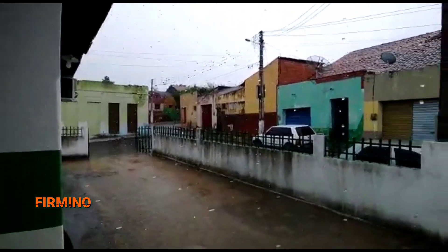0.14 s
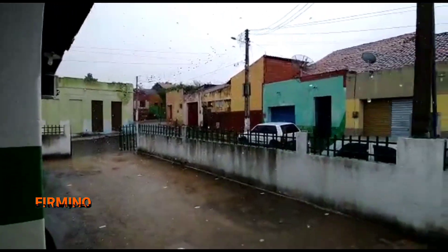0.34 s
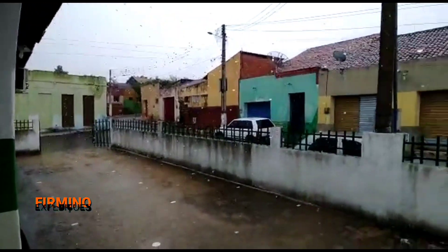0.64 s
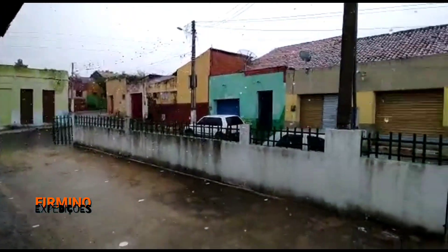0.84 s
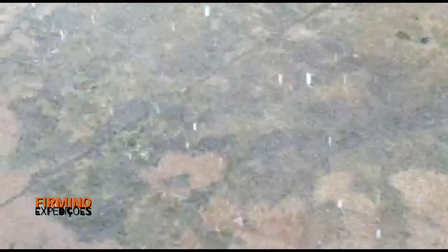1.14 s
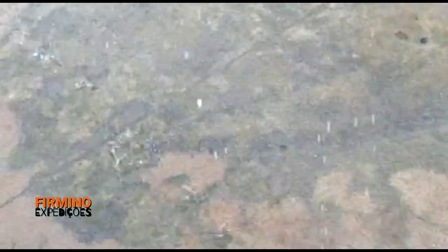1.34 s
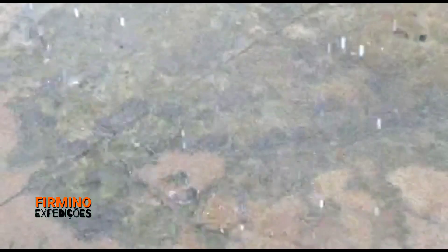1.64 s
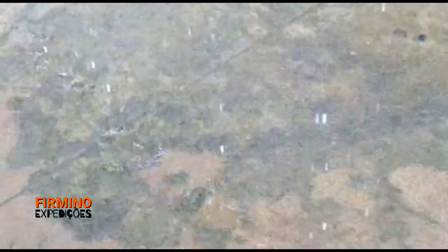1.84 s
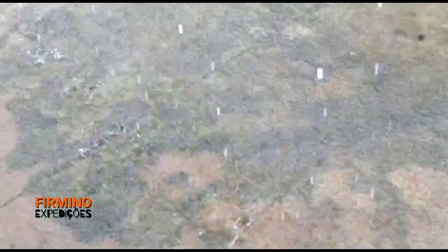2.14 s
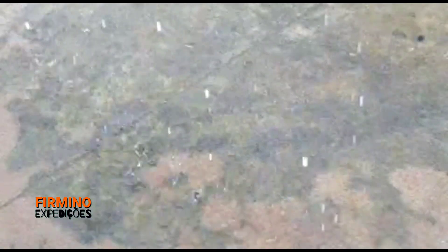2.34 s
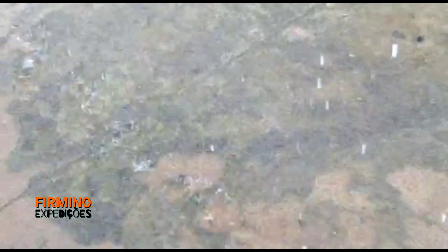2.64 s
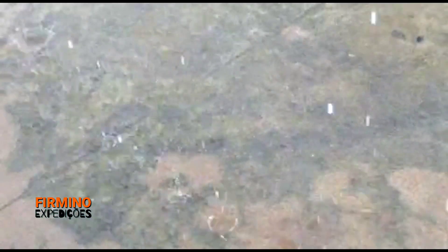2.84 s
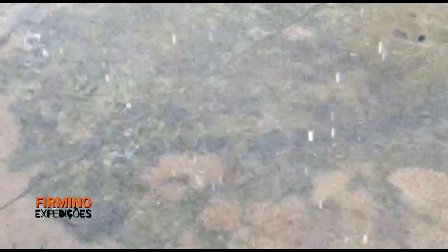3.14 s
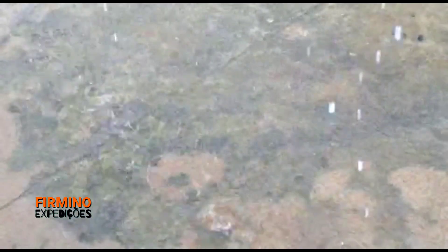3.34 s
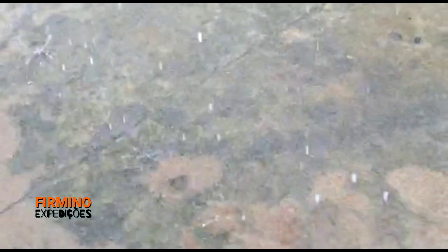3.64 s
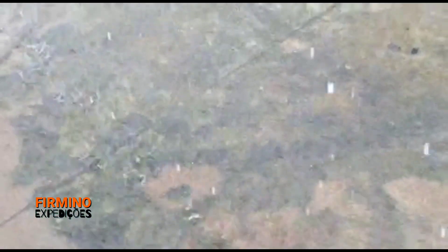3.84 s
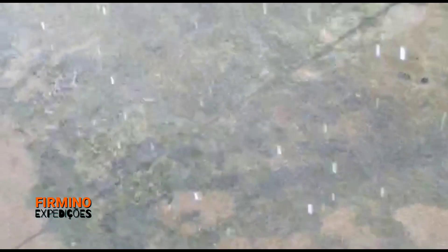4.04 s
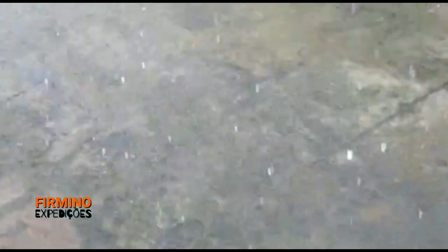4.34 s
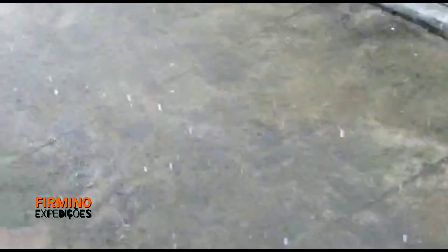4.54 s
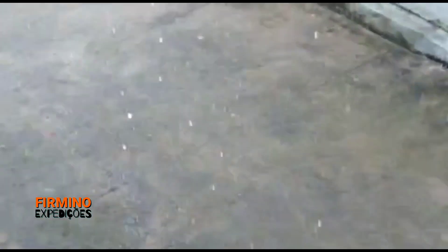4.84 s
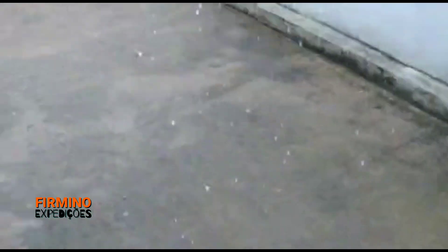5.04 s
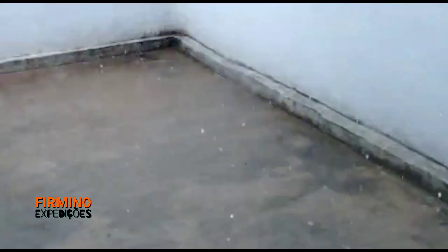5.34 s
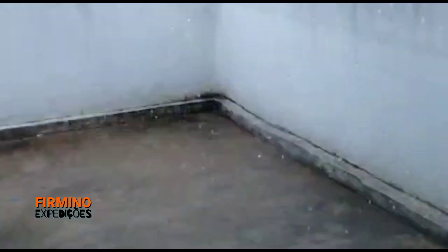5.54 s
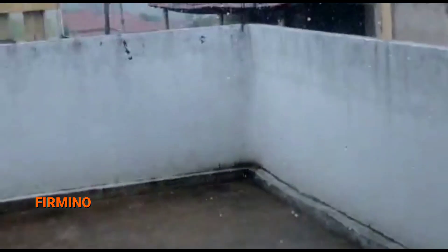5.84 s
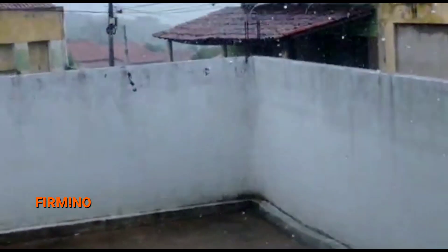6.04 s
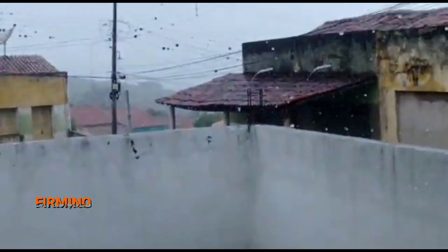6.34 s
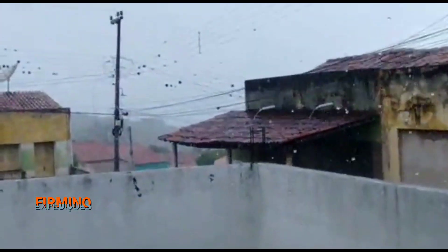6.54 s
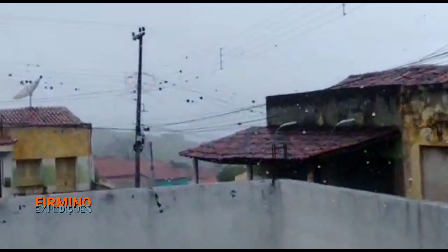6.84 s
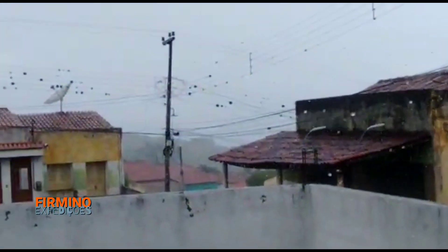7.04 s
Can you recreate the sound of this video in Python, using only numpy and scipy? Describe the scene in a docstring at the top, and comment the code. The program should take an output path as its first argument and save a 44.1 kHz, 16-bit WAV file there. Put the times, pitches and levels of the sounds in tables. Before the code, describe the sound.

A steady bright downpour heard from a porch, full of crisp ticking drops, puddle plips and irregular spattering run-off.

```python
"""Heavy rain on tiles and flooded paving, heard by a hand-held phone under a porch: noise, partly chopped
into thousands of drops, forms a far hiss, a low roar and a patter that gushes of run-off swell.
Short clicks are drops on hard paving, rising tones are bubbles in puddles, and fat drops ring surfaces.
Run-off from the eaves lands in cracks with a spatter of noise; drips ring something hollow nearby.
The colour shifts as the phone turns, and its two ports (left and right) hear differently."""
import sys
import numpy as np
from scipy import signal
from scipy.fft import rfft, irfft, next_fast_len
from scipy.io import wavfile
from scipy.ndimage import uniform_filter1d, map_coordinates

SR = 44100
rng = np.random.default_rng(int(sys.argv[2]) if len(sys.argv) > 2 else 0)


def file_out(sig):
    """Save sig as 16-bit WAV at sys.argv[1]."""
    # one column per channel
    cols = np.atleast_2d(sig).T
    # limit, then scale
    lim = np.clip(cols, -1, 1)
    pcm = np.round(lim * 32767).astype(np.int16)
    wavfile.write(sys.argv[1], SR, pcm)


N = 317065

# middle pitches of rumble, roar, drumming, low patter, dull patter, bright drops, spray: [Hz]
LAYER_HZ = [90, 400, 1100, 1900, 3500, 7500, 12500]
# run-off splashes: (time [s], level before the port and pitch gains [dB], centre [Hz],
# spatter against the splash level [dB], spatter length [s])
SPLASHES = [(.01, -20, 8000, -11, .03), (.0205, -21, 8300, -16, .02), (0.026, -24, 8300, -16, .02),
            (0.102, -18, 7760, -11, 0.027), (0.108, -19, 8500, -14, .03), (.129, -22.5, 7840, -10, .05),
            (.2, -26, 6500, -19, .03), (.2737, -19, 8190, -16, .05), (0.3284, -14, 8630, -20, .046),
            (0.413, -21, 8650, -18, .04), (.4245, -22, 8500, -18, .03), (.4715, -25, 8500, -21, .03),
            (.4803, -17, 8450, -19, .05), (0.516, -25, 8300, -20, .03), (0.522, -15, 8000, -15, .06),
            (0.58, -23, 7500, -18, .04), (.6078, -19, 8200, -9, .04), (0.62, -17, 7700, -12, .05),
            (0.634, -16, 8320, -13, .06), (.6611, -17, 8040, -15, .05), (0.796, -26, 3950, -18, .03),
            (0.866, -18, 7470, -17, .05), (0.918, -17, 3680, -13, .03), (.937, -16, 8220, -16, 0.027),
            (.942, -25, 4160, -8, .06), (0.967, -15.5, 8400, -11, 0.048), (0.974, -24, 8500, -16, .03),
            (1.08, -21, 8240, -16, .03), (1.09, -17, 8000, -16, .03), (1.097, -22, 10000, -15, .031),
            (1.2508, -22, 8500, -14, .03), (1.419, -23, 2400, -6, .05), (1.4335, -23, 5800, -14, .04),
            (1.5055, -28, 6000, -16, .03), (1.526, -21, 3200, -12, .02), (1.5665, -18, 8000, -14, .04),
            (1.712, -25, 3800, -7, .04), (2.1088, -25, 3700, -14, .03), (2.1324, -21, 3700, -11, .03),
            (2.317, -18.5, 5400, -5, 0.055), (2.3355, -23, 5600, -10, .03), (2.3515, -17, 6550, -13, .04),
            (2.355, -21, 6600, -12, .03), (2.7225, -17, 8100, -14, .04), (2.739, -25, 3420, -14, .02),
            (2.7475, -21, 3140, -5, .02), (2.753, -22, 3700, -11, .025), (2.7875, -29, 2980, -12, 0.033),
            (2.793, -23.5, 4200, -14, .03), (2.971, -21, 2870, -13, .02), (2.9777, -32, 3300, -12, .02),
            (2.9916, -23, 3800, -10, .02), (2.995, -22, 2820, -17, .02), (3.0978, -19, 8300, -18, .03),
            (3.15, -23, 5000, -11, .04), (3.384, -23, 3170, -14, .03), (3.488, -18, 8190, -13, .04),
            (3.561, -22, 4660, -5, 0.034), (3.776, -14, 8000, -16, .05), (3.826, -25, 3700, -14, .03),
            (3.994, -25, 2240, -17, .04), (4.312, -22, 5800, -16, .03), (4.3668, -26, 2340, -8, .04),
            (4.421, -25, 2800, -7, .03), (4.509, -18, 8260, -20, .03), (4.522, -19, 3280, -16, .02),
            (4.559, -22.5, 2380, -4, .035), (4.8713, -17, 8350, -10.5, .08), (4.872, -20, 4670, -12, .05),
            (4.8785, -16, 9100, -14, .04), (4.886, -19, 8500, -16, .03), (5.3094, -22, 7170, -9, .07),
            (5.3694, -26, 2200, -14, .07), (5.6094, -21.5, 7000, -6, 0.12), (5.6117, -27, 2300, -12, .03),
            (5.753, -26, 9270, -6, .07), (5.825, -20, 2310, -8, .04), (5.991, -32, 2080, -19, .02),
            (6.096, -25, 2200, -6, .05), (6.108, -25, 2000, -10, .03), (6.67, -16, 7280, -12, 0.064),
            (6.737, -25, 2300, -12, .04), (6.808, -20, 2160, -7, .05), (6.9815, -19, 6300, -12, .03),
            (7.033, -20, 3770, -14, .03), (7.098, -17, 6500, -10, .03), (7.143, -15, 7600, -7.5, 0.076)]
# drips on the hollow thing: (time [s], level before the port gains [dB], lowest ring [Hz], length [s])
DRIPS = [(3.842, -47, 480, .05), (3.889, -46, 300, .05), (5.064, -41.5, 900, .07), (5.172, -47, 570, .033),
         (5.262, -45, 600, .033), (5.436, -46, 600, .03), (5.462, -41, 600, .038), (5.663, -43, 660, .036),
         (5.705, -47, 600, .04), (5.959, -47, 600, .035)]
# colour each port gives the rain, as relative gains: (pitch [Hz], left [dB], right [dB])
PORT_GAINS = [(49, -30, -31), (92, -14.5, -18.5), (140, -16.5, -18), (198, -16, -18.5), (604, -14, -16),
              (920, -12, -15.5), (2050, -5, -13), (2720, -6.5, -10), (4170, -6, -10), (5730, -7, -11.5),
              (6700, -4, -11), (10000, -5.5, -9), (12140, -13.5, -12.5), (14800, -15.5, -16.5)]
# resonances of each port: (pitch [Hz], width [Hz], boost [dB])
LEFT_RESONANCES = [(87, 15, 2.5), (689, 43, 0.5), (6960, 170, 3.5), (8120, 960, 6), (9300, 210, 5)]
RIGHT_RESONANCES = [(88, 14, 3), (2840, 200, 2.5), (6950, 200, 2), (8300, 900, 1.5), (9400, 400, 1.5)]
# how alike left and right are: (pitch [Hz], likeness [0-1])
LIKENESS = [(60, 0.99), (290, 0.99), (640, 0.58), (1400, 0.04)]
# echoes off porch floor, wall and ceiling: (left delay [s], right delay [s], gain [dB])
ECHOES = [(.0074, 0.009, -15.5), (0.013, 0.02, -16), (0.021, 0.04, -20.5)]
# lean of the rain to one side: (time [s], left minus right against its mean [dB])
SIDE_LEAN = [(0, 2), (.7, 2), (1.3, 0), (2, -.6), (5, -.4), (6, .6), (7.19, .6)]
# surfaces that ring under the fat drops: (pitch [Hz], width [Hz], left minus right [dB])
SURFACES = [(624, 51, 5), (1620, 160, 14), (2207, 115, 10), (3800, 660, 17)]
# how much reaches the left port as the phone turns, before the gushes:
# (time [s], first surface [dB], second [dB], third [dB], fourth [dB])
SURFACE_LEVELS = [(0, -84, -81, -74, -57), (1.2, -70, -57, -52, -44), (1.5, -70, -70, -53, -42),
                  (3.5, -80, -72, -51, -40.5), (4.4, -71, -68, -50, -48), (4.9, -59, -69, -47.5, -45),
                  (6, -56.5, -51, -44.5, -45.5), (6.7, -63, -47, -43.5, -50), (7.19, -54, -57, -49, -38)]
# steady patter, of which only the changes about the mean are used: (time [s], bright drops [dB], dull patter [dB])
PATTER_LEVELS = [(0, -41, -47.5), (.44, -41, -48), (.84, -40, -44), (1.17, -42.5, -45.5),
                 (1.235, -41.5, -45.5), (1.255, -38, -42), (1.7, -37, -39), (1.88, -38, -40.5),
                 (2.05, -35, -38), (2.6, -36, -38.5), (3.3, -35.5, -38.5), (3.6, -34.5, -38.5),
                 (3.74, -35, -41.5), (3.9, -35.5, -39), (4.6, -35, -38), (5.2, -35.5, -40),
                 (5.7, -35.5, -41), (5.99, -34, -39.5), (6.43, -34.5, -39.5), (7.19, -33.5, -38)]
# gushes of run-off that swell the patter round a pitch:
# (time [s], swell at the centre [dB], centre [Hz], spread [octaves], length [s])
GUSHES = [(0, 3, 7500, 0.54, 0.069), (0.322, 6, 10400, .5, 0.037), (.46, 2.7, 8800, 0.42, 0.12),
          (0.6, 1.5, 7500, 0.79, 0.17), (0.617, 3, 3200, 0.39, 0.18), (0.913, 6, 4300, 0.4, 0.14),
          (0.963, 6, 10000, .45, 0.071), (0.98, 7, 1840, 0.28, 0.15), (1.08, 5, 11000, .5, 0.049),
          (1.413, 5, 2500, 0.36, 0.097), (1.64, 3, 2600, 0.25, 0.046), (1.69, 5, 2620, .35, 0.044),
          (1.402, 4, 7000, 0.69, 0.16), (1.606, 3, 3800, 0.39, .16), (1.605, 6, 11500, .5, 0.062),
          (2.07, 3.5, 3440, 0.26, 0.2), (2.073, 2, 8560, .35, 0.05), (2.197, 3.5, 8000, 0.64, 0.038),
          (2.315, 3, 5100, 0.77, 0.16), (2.708, 2.5, 10600, 0.38, 0.1), (2.737, 6, 2900, 0.45, .035),
          (2.783, 6.5, 2900, 0.4, 0.023), (2.965, 7.5, 3000, 0.35, 0.055), (3.037, 3, 8800, 0.65, 0.1),
          (3.377, 3.5, 2780, 0.35, 0.22), (3.81, 3, 3700, 0.58, 0.04), (3.98, 6, 2400, 0.38, 0.07),
          (4.364, 3.5, 2320, 0.4, 0.04), (4.412, 6, 2700, .4, .04), (4.488, 0, 2400, .4, .05),
          (4.418, 3, 8800, 0.41, 0.12), (4.543, 4.5, 2700, 0.72, 0.053), (4.868, 4.5, 6470, 0.54, 0.095),
          (5.012, 3, 7000, .6, 0.083), (4.99, 3.5, 2740, 0.61, 0.11), (5.305, 3, 3600, 0.76, 0.19),
          (5.308, 0.5, 8550, 0.57, 0.16), (5.367, 2.5, 2180, 0.44, 0.21), (5.598, 5.5, 2500, 0.45, 0.053),
          (5.744, 4, 11000, 0.7, 0.1), (5.812, 4.5, 2500, 0.58, 0.058), (6.064, 3.5, 2300, 0.61, 0.15),
          (6.208, 4.5, 2800, 0.6, 0.036), (6.396, 1, 10300, 0.43, 0.23), (6.668, 1.5, 6760, 0.57, 0.13),
          (6.725, 2.5, 2300, 0.45, 0.18), (7.047, 3.5, 8800, 0.59, 0.065)]
# low layers, of which only the changes about the mean are used:
# (time [s], rumble [dB], roar [dB], drumming [dB])
BASS_LEVELS = [(0, -62.5, -57, -55.5), (.7, -64.5, -54, -53), (1.2, -65.5, -57, -51.5),
               (1.6, -62, -56.5, -49.5), (2.4, -64, -54.5, -51.5), (3, -65, -56, -50),
               (3.8, -62, -53, -49.5), (4.4, -59, -54.5, -50), (5.1, -64, -53.5, -49.5),
               (5.8, -61.5, -55, -49.5), (6.4, -63.5, -54.5, -51), (7.19, -63, -52.5, -49)]
# bare ticks on hard paving, level before the gushes, patter and port gains:
# (pitch [Hz], ring-down [s], drops [per s], level [dB])
PAVING_TICKS = [(2318, .0044, 300, -50.5), (2970, 0.0043, 300, -50), (4050, 0.0032, 350, -49),
                (5100, .0019, 300, -48)]

RAIN_DB = -30  # loudness of the rain bed before its lean and echoes
LOW_FOLLOWS, SPRAY_FOLLOWS = 0.7, 0.9  # share of the dull and bright changes that low patter and spray follow
GUSH_ATTACK_S = 0.0024
TOP_HZ = 15300
T = np.arange(N) / SR
SIZE = next_fast_len(N)
HZ = np.maximum(np.arange(SIZE // 2 + 1) * SR / SIZE, 1)


def undb(db):
    """Turn dB into a plain gain."""
    return 10 ** (np.asarray(db) / 20)


def unit(x):
    """Scale to an rms (average strength) of 1."""
    return x / np.sqrt(np.mean(x ** 2))


def walk(rate):
    """Wander through random levels, each held 1 / rate s and then smoothed; rms 1."""
    hold = int(SR / rate)
    held = np.repeat(rng.standard_normal(N // hold + 1), hold)[:N]
    return unit(uniform_filter1d(held, hold))


def fade(x, t60):
    """Let every spike die away by 60 dB in t60 seconds."""
    return signal.lfilter([1], [1, -np.exp(-np.log(1000) / (t60 * SR))], x)


def spikes(per_s, spread_db, shape):
    """Random impacts, many small and few large; drops break up above a largest size."""
    chance = rng.random(shape) * SR / per_s
    hit = chance < 1
    out = np.zeros(shape)
    out[hit] = undb(-spread_db * np.log(1 - .97 * chance[hit]))
    return out


def gushes(hz):
    """Swell in dB at one pitch: each gush of run-off rises fast and thins out."""
    out = np.zeros(N + SR)
    for s, db, centre_hz, octaves, lasting in GUSHES:
        t, start = T[:int(2 * lasting * SR)], int(s * SR)
        near = np.exp(-.5 * (np.log2(hz / centre_hz) / octaves) ** 2)
        shape = np.clip(t / GUSH_ATTACK_S, 0, 1) * np.exp(-1.33 * (t / lasting) ** 2.8)
        out[start:start + len(t)] += db * near * shape
    return out[:N]


def patter_curves():
    """Levels of the bright drops and the dull patter over time in dB, then the dull patter about its table mean."""
    s, bright_db, dull_db = np.transpose(PATTER_LEVELS)
    return np.interp(T, s, bright_db), np.interp(T, s, dull_db), np.interp(T, s, dull_db - dull_db.mean())


def drips():
    """A soft, gurgling blow rings three close hollow modes."""
    out, t = np.zeros(N + SR), T[:SR // 4]
    for s, db, hz, lasting in DRIPS:
        ring = sum(gain * np.sin(2 * np.pi * ratio * hz * t) for ratio, gain in [(1, 1), (1.13, 0.8), (1.24, .5)])
        gurgle = 1 + 0.37 * unit(uniform_filter1d(rng.standard_normal(len(t)), SR // 150))
        swell = (1 - np.exp(-t / 0.0034)) * np.exp(-3 * (t / lasting) ** 2)
        start = int(s * SR)
        out[start:start + len(t)] += undb(db) * ring * gurgle * swell
    return out[:N] * undb([[1.6], [-1.6]])


def ringing():
    """Fat drops, a few hundred a second, set each surface ringing at its own pitch."""
    s, *columns = np.transpose(SURFACE_LEVELS)
    out = 0
    for (hz, width, pan_db), db in zip(SURFACES, columns):
        blows = fade(spikes(450, 2.9, (N,)), 0.0084) * rng.standard_normal((2, N))
        resonance = 1 / (1 + (2 * (HZ - hz) / width) ** 2)
        ring = irfft(rfft(blows, SIZE) * resonance, SIZE)[:, :N]
        level_db = np.interp(T, s, db) + gushes(hz) - np.array([[0], [pan_db]])
        out = out + unit(ring) * undb(level_db)
    return out


def plips(count=1500):
    """Drops into puddles trap a bubble that rings a few cycles and glides up, louder with the dull patter."""
    out, t = np.zeros((2, N + SR)), T[:SR // 60]
    dull_db = patter_curves()[2]
    for s, pitch, size, side, lag in rng.random((count, 5)):
        hz = 1500 * 4.5 ** pitch
        ring = np.sin(2 * np.pi * hz * t * (1 + 0.0047 * hz * t / 2)) * np.exp(-t * hz / 7)
        start, late = int(s * N), int(20 * lag)  # the right port hears it up to 19 samples later
        gain = undb(-52 + 2.5 * pitch - 4.5 * np.log(1 - .97 * size) + dull_db[start])
        out[0, start:start + len(t)] += ring * gain * undb(2.0 + 4.7 * (side - 1.0))
        out[1, start + late:start + late + len(t)] += ring * gain * undb(-4.0 - 7.9 * (side - .5))
    return out[:, :N]


def click(hz, t60, per_s, spread_db):
    """Random impacts ring one short mode; each port catches its own."""
    r = np.exp(-np.log(1000) / (t60 * SR))
    ring = [1, -2 * r * np.cos(2 * np.pi * hz / SR), r * r]
    return unit(signal.lfilter([1, -1], ring, spikes(per_s, spread_db, (2, N))))


def ticks():
    """Lone drops click sharply on hard paving, rising and falling with the dull patter."""
    out = sum(click(hz, t60, per_s, spread_db=4.0) * undb(db + gushes(hz)) for hz, t60, per_s, db in PAVING_TICKS)
    thin = signal.butter(3, 1200, "high", fs=SR, output="sos")
    return signal.sosfilt(thin, out) * undb(patter_curves()[2]) * undb([[3], [-3]])


def splashes():
    """A broad crack and a ring of a few cycles, then a spatter of droplets that lasts a moment and thins out."""
    out, t = np.zeros((2, N + SR)), T[:SR // 6]
    for s, db, hz, spatter_db, lasting in SPLASHES:
        # counted in cycles of the ring; the right port is a little further off
        cycles = np.maximum(hz * (t - np.array([[0], [.0002]])), 0)
        decay = .45 * np.exp(-cycles / 1.5) + .6 * np.exp(-cycles / 6.5)
        crack = np.sin(2 * np.pi * cycles) * decay * (hz / 8000) ** .25
        no_bass = signal.butter(2, hz / 2.5, "high", fs=SR, output="sos")  # small drops make no bass
        crack = signal.sosfilt(no_bass, crack)
        droplets = np.exp(-3 * (t / lasting) ** 2.13) * (.3 + fade(spikes(440, 2.75, t.shape), 0.0065))
        band = signal.butter(1, [hz / 1.16, min(hz * 1.17, .45 * SR)], "band", fs=SR, output="sos")
        spatter = undb(spatter_db) * signal.sosfilt(band, droplets * rng.standard_normal((2, len(t))))
        start = int(s * SR)
        out[:, start:start + len(t)] += (crack + spatter) * undb(db + np.array([[5.5], [-2]]))
    return out[:, :N]


def port_colour():
    """Gain over frequency of the left and right port, with their resonances."""
    hz, *sides = np.transpose(PORT_GAINS)
    out = [np.interp(np.log(HZ), np.log(hz), side) for side in sides]
    for k, modes in enumerate((LEFT_RESONANCES, RIGHT_RESONANCES)):
        out[k] = out[k] + sum(boost / (1 + (2 * (HZ - f) / width) ** 2) for f, width, boost in modes)
    return undb(out)


def layer_changes():
    """Rise and fall of the seven rain layers, low to high, in dB about their means."""
    s, *bass = np.transpose(BASS_LEVELS)
    bright_db, dull_db, _ = patter_curves()
    rows = [np.interp(T, s, db) for db in bass]
    rows = np.array(rows + [LOW_FOLLOWS * dull_db, dull_db, bright_db, SPRAY_FOLLOWS * bright_db])
    return rows - rows.mean(axis=1, keepdims=True)


def drop_noise():
    """Spectra of steady noise, fat drops and small drops, each coloured by the two ports."""
    hz, likeness = np.transpose(LIKENESS)
    like = np.interp(np.log(HZ), np.log(hz), likeness)
    colour, spectra = port_colour(), []
    big = unit(fade(spikes(400, 5.1, (N,)), 0.012))  # fat drops slap dull
    small = unit(fade(spikes(1000, 4.5, (N,)), 0.011))  # small drops tick bright
    for gate in (1, big, small):  # both ports hear the same drops at the same time, but by other paths
        a, b = rfft(rng.standard_normal((2, N)) * gate, SIZE)
        spectra.append(colour * np.array([a, like * a + np.sqrt(1 - like ** 2) * b]))
    return spectra


def rain():
    """Each third-octave of noise follows its layer and the gushes and flickers alone; 4-8 kHz is grainiest."""
    rows, spectra = layer_changes(), drop_noise()
    out, step = 0, 1 / 3
    for octave in np.arange(5, 14.5, step):
        band = np.cos(np.pi / 2 * np.clip((np.log2(HZ) - octave) / step, -1, 1)) ** 2
        # share of near drops, and how many of those are small
        near = np.interp(octave, np.log2([300, 1500, 4000, 8000, 13000]), [0.1, 0.22, 0.35, 0.34, 0.15])
        fine = np.clip((octave - 11.5) / 1.67, 0, 1)
        mix = np.sqrt([1 - near, near * (1 - fine), near * fine])
        # blend the two layers on either side of this pitch
        place = np.interp(octave, np.log2(LAYER_HZ), np.arange(len(rows)))
        k = min(int(place), len(rows) - 2)
        layer_db = rows[k] + (place - k) * (rows[k + 1] - rows[k])
        flicker_db = 0.14 * walk(3.32) + near * 2.44 * walk(12)
        top = np.flatnonzero(band > 1e-9)[-1] + 1  # nothing in the band lies above this
        mixed = band[:top] * sum(m * v[:, :top] for m, v in zip(mix, spectra))
        out = out + undb(layer_db + gushes(2 ** octave) + flicker_db) * irfft(mixed, SIZE)[:, :N]
    turn = np.interp(T, *np.transpose(SIDE_LEAN)) / 2
    return unit(out) * undb(RAIN_DB + np.array([turn, -turn]))


def porch(dry):
    """Near surfaces return the rain a few ms late; the paths drift a little as the hand moves."""
    out = dry.copy()
    for *lags, db in ECHOES:
        drift = 0.000494 * np.cumsum(walk(1.498)) / SR
        for k in range(2):
            heard_at = (T - lags[k] - drift) * SR
            out[k] += undb(db) * map_coordinates(dry[k], [heard_at], order=1, mode="mirror")
    return out


def scene():
    """All the rain at the two ports; drips and splashes come without porch echoes."""
    return drips() + splashes() + porch(ringing() + plips() + ticks() + rain())


def record(dry):
    """The phone cuts the top of the treble."""
    return signal.sosfilt(signal.ellip(10, .2, 75, TOP_HZ, fs=SR, output="sos"), dry)


dry = scene()
out = record(dry)
file_out(out)
```